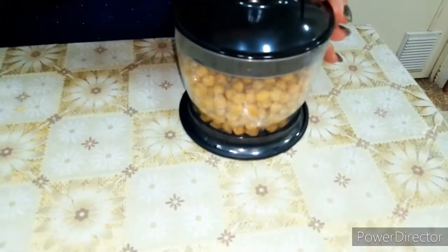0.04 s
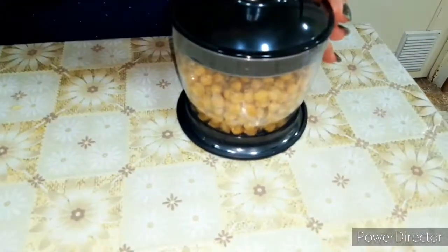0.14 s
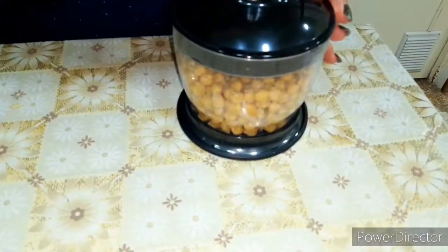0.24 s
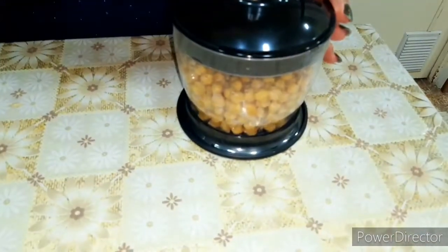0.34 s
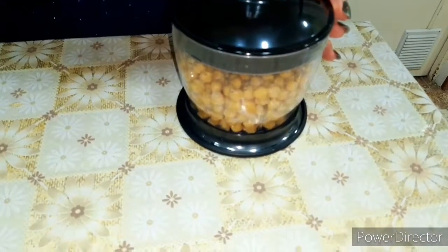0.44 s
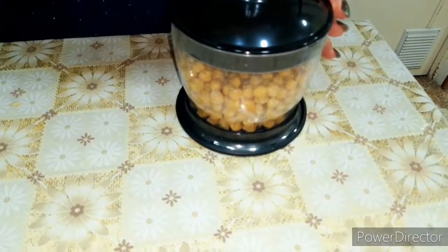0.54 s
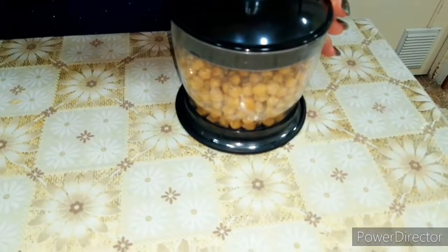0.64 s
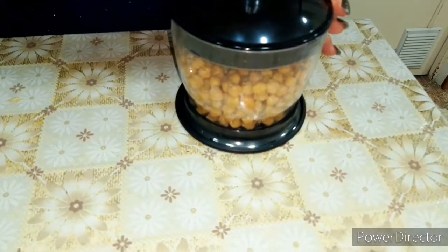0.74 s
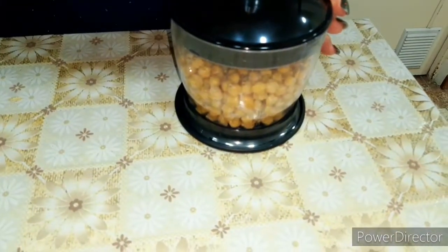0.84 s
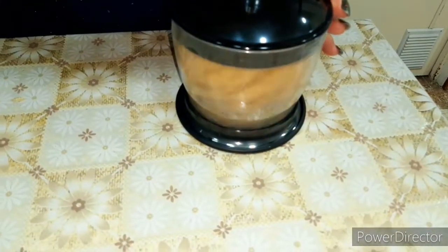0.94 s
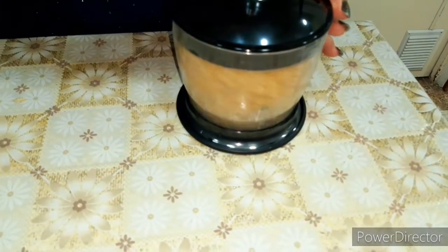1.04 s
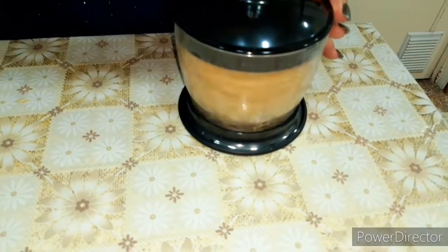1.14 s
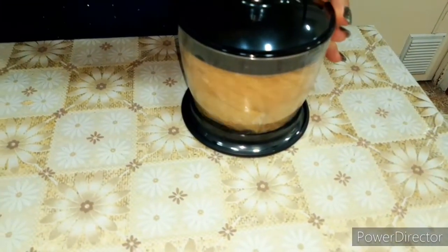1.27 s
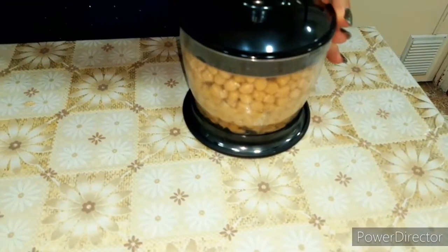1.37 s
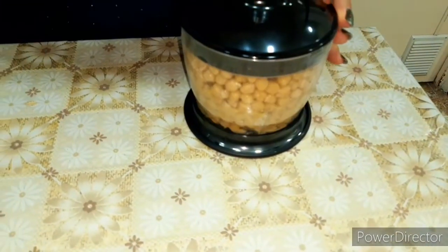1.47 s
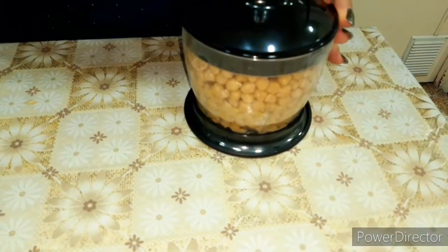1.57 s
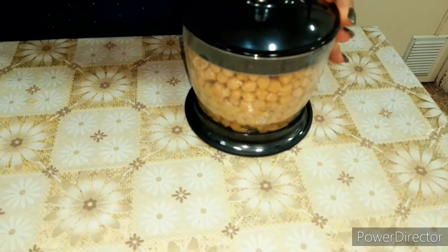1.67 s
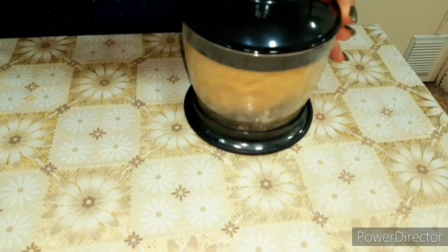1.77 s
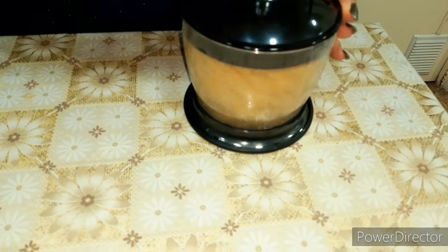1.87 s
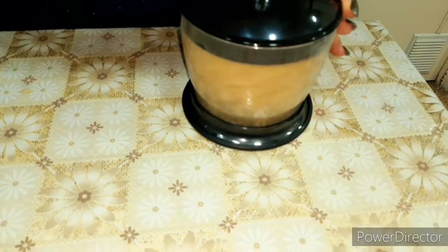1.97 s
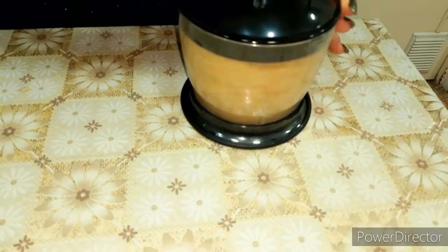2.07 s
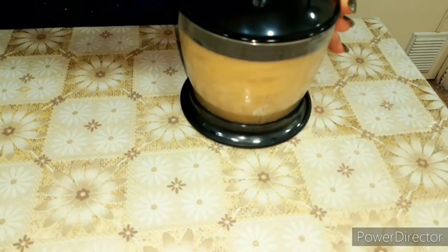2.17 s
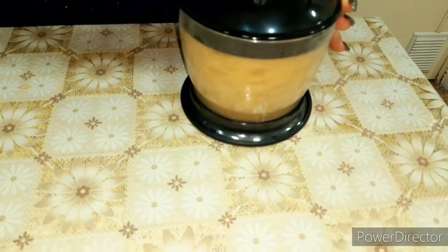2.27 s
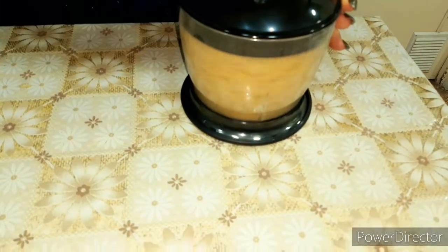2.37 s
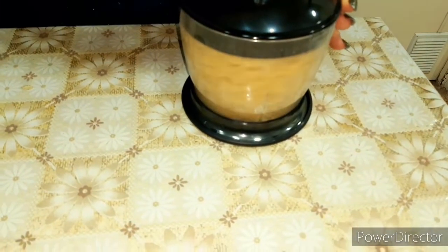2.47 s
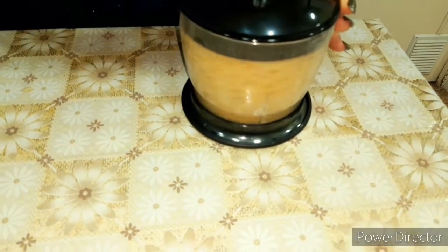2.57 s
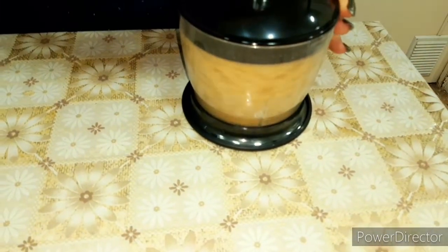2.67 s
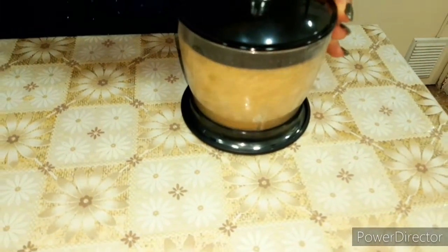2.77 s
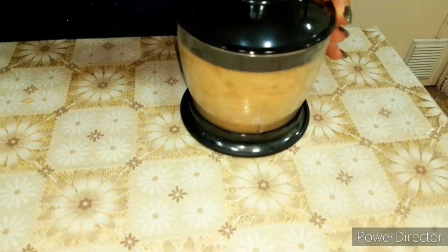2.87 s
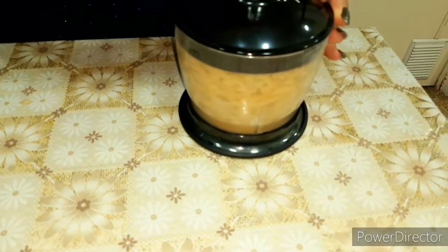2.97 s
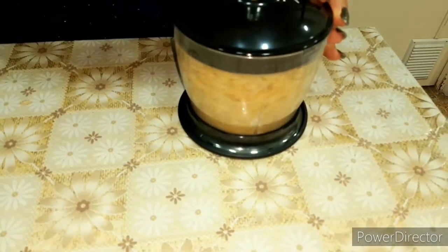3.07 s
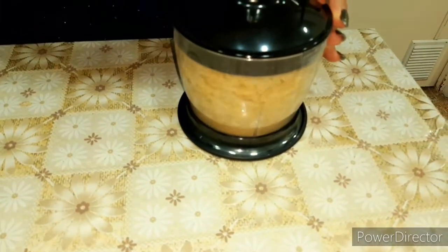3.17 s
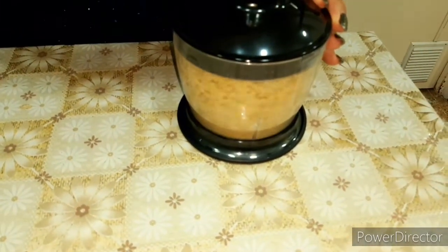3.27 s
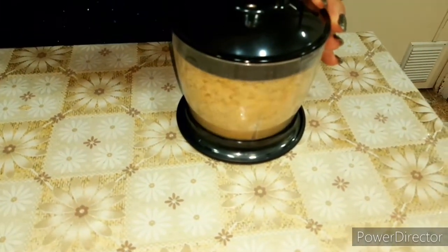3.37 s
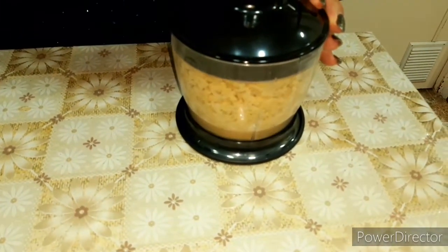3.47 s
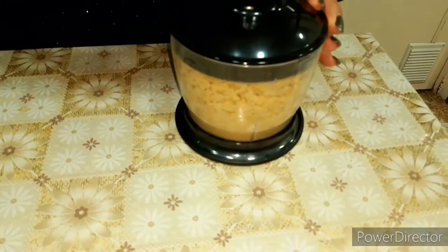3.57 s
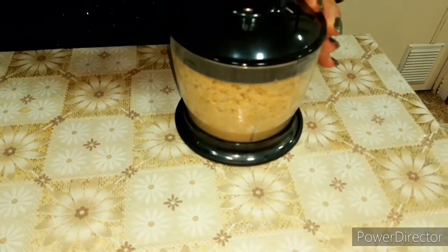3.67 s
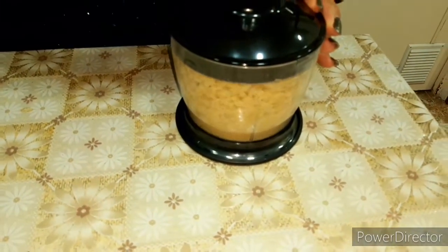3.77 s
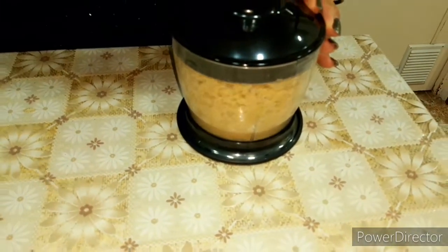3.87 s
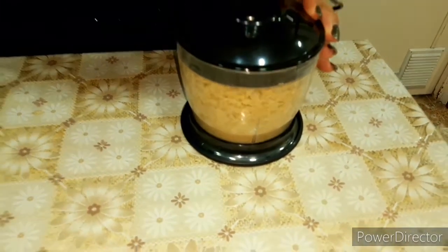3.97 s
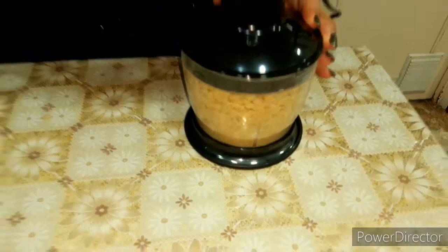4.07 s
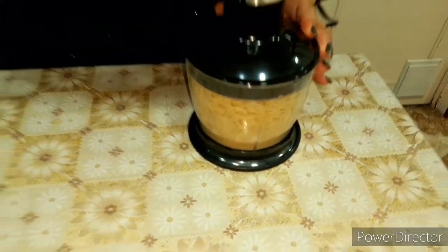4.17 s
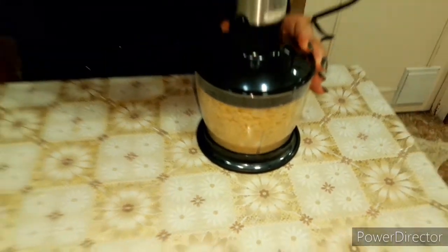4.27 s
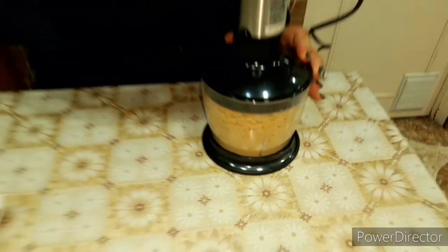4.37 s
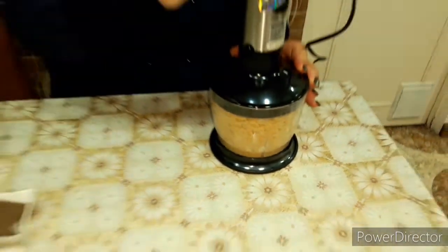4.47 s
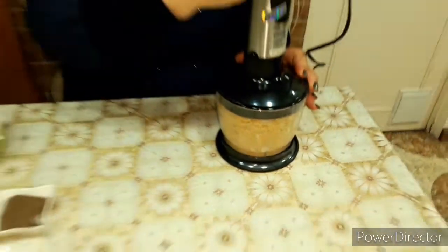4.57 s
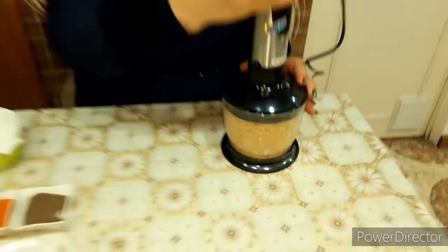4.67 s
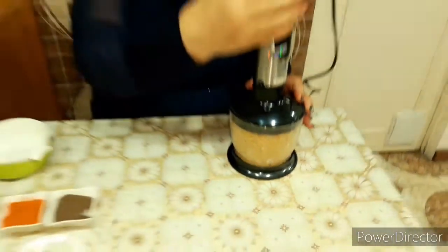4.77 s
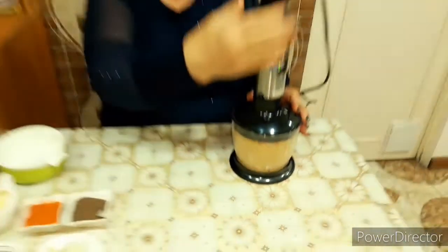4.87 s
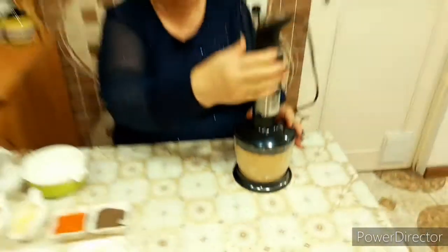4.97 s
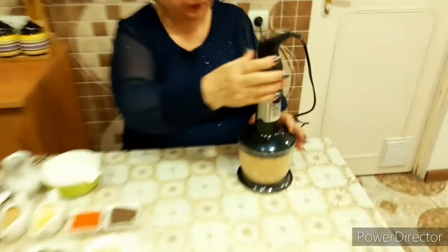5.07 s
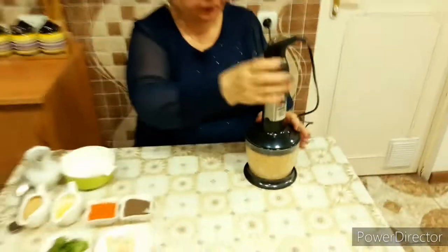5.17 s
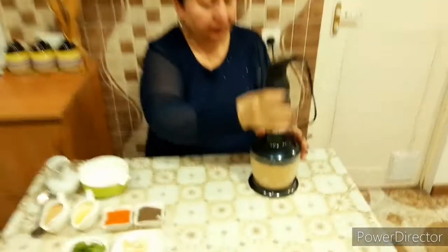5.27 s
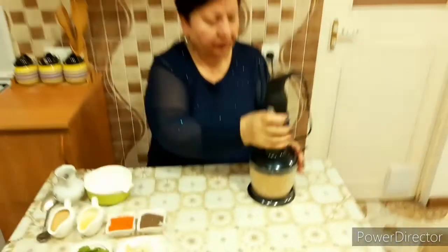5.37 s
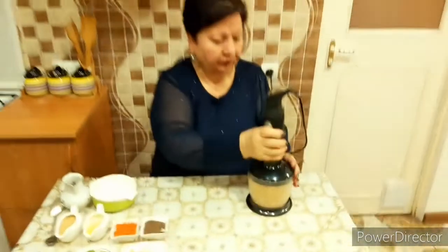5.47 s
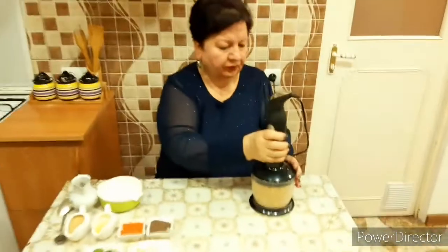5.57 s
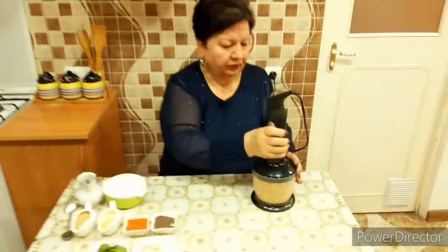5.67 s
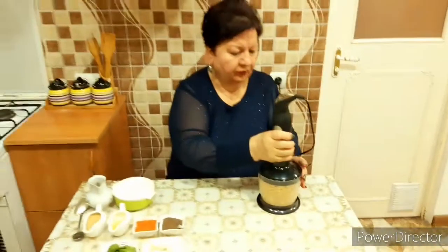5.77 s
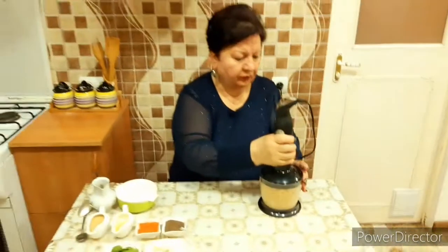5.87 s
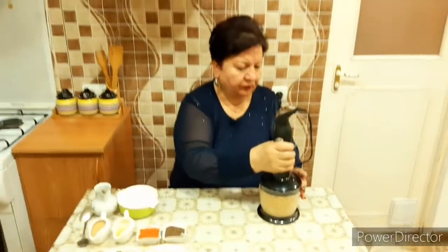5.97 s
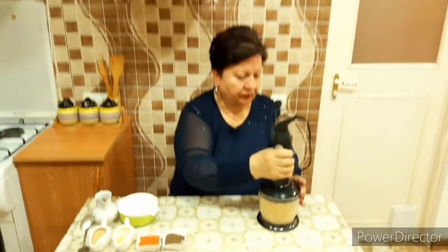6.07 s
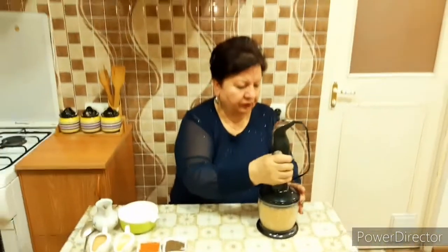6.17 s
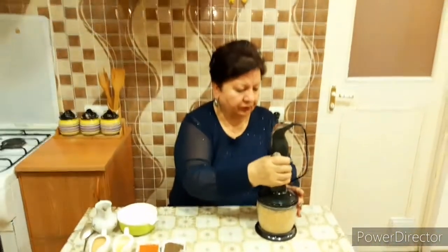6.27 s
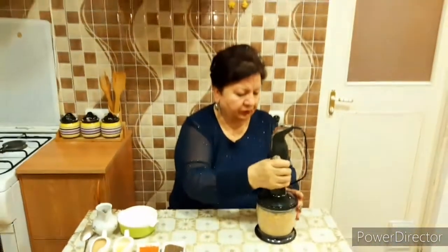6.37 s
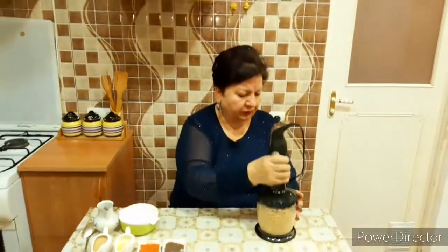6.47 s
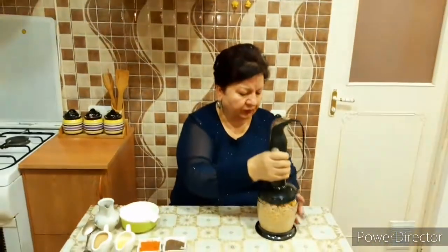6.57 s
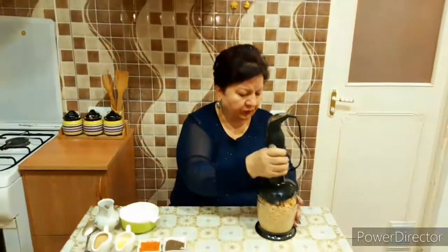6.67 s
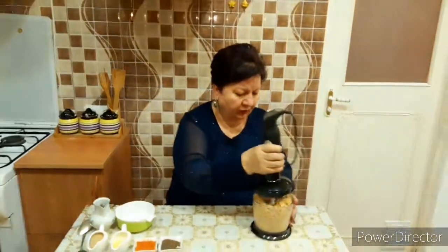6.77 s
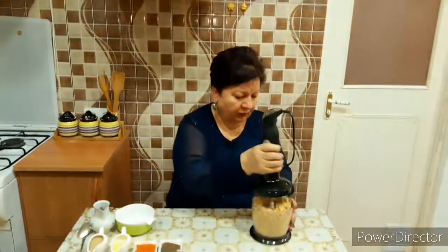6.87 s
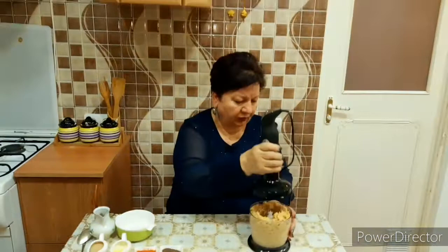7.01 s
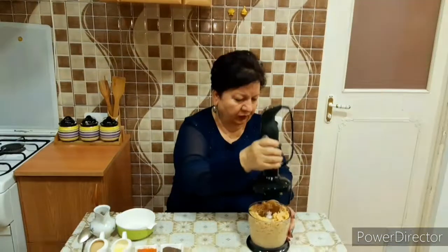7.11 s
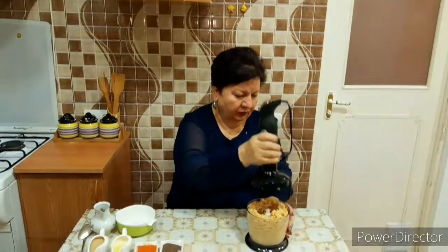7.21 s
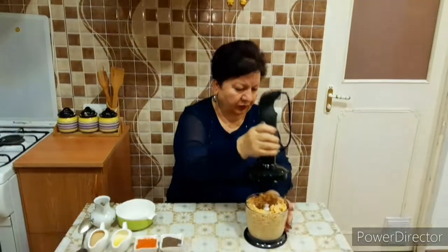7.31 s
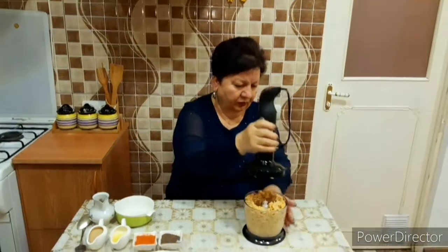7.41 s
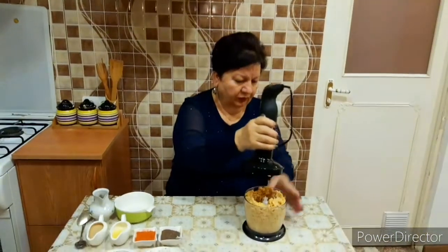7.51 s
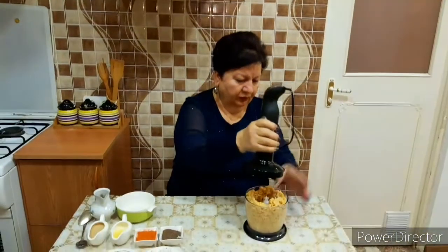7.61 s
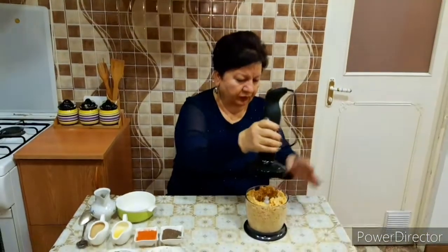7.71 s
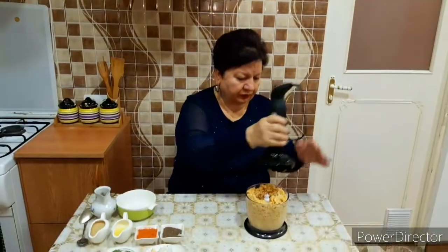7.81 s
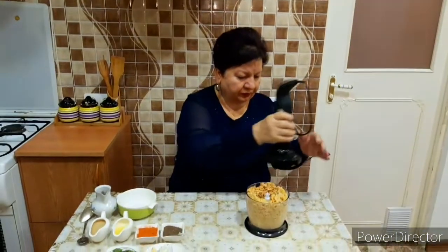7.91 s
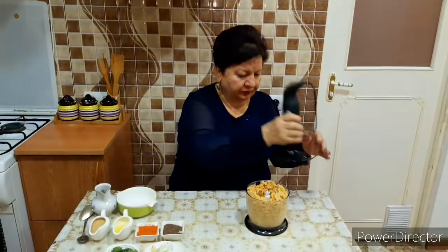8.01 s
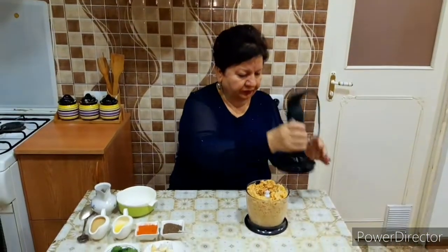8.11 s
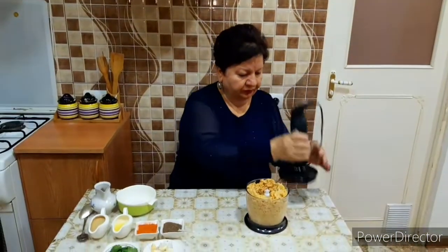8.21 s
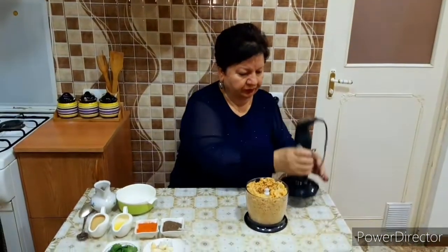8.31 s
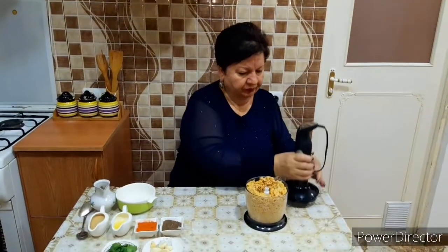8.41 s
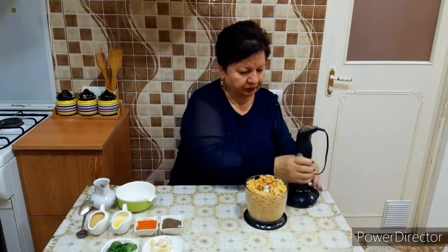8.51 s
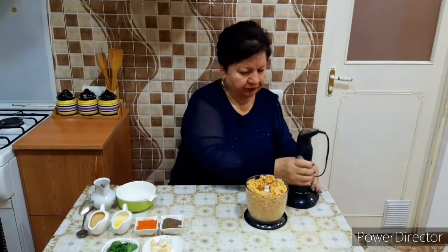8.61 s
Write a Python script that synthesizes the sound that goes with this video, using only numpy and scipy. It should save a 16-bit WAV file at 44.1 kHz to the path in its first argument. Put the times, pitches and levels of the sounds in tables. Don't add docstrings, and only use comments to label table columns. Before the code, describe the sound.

In a tiled kitchen, a whining geared motor crushes boiled chickpeas in a jumping plastic bowl, stops, and hands click the lid loose and lift it.

```python
import sys
import numpy as np
from scipy import signal
from scipy.fft import rfft, irfft, next_fast_len
from scipy.io import wavfile

SR = 44100
rng = np.random.default_rng(int(sys.argv[2]) if len(sys.argv) > 2 else 0)


def wav_record(signal):
    frames = np.transpose(np.atleast_2d(signal))
    bounded = np.clip(frames, -1, 1)
    quanta = np.round(bounded * 32767).astype(np.int16)
    wavfile.write(sys.argv[1], SR, quanta)


def magnitude_from_level(level_db):
    exponent = np.asarray(level_db, float) / 20
    return 10 ** exponent


N = 381465
SIZE = next_fast_len(N + SR)
MAINS_HZ = 50

# (frequency [Hz], time to die by 60 dB [s], echoes over direct sound [dB])
ROOM_REPLY = [(60, 0.57, -0.5), (150, 0.89, -5), (304, 0.46, -0.5), (600, 0.76, 0.5), (1520, 0.6, -2.5),
              (2980, 0.47, -4), (5900, .44, -1), (11700, .25, 2.5)]
# (frequency [Hz], level [dB per Hz])
CRUSH_COLOUR = [(2530, -26.5), (4300, -1.5), (6110, -4.5), (6620, -8), (7620, -6.5), (8590, -17),
                (10500, -12), (13000, -13.5), (14700, -17.5), (15100, -24), (15600, -38)]


def in_time(rows):
    s, *columns = np.transpose(rows)
    return [np.interp(np.arange(N) / SR, s, c) for c in columns]


def at_hz(points, hz):
    points = np.array(points)
    return np.interp(np.log(hz + 1), np.log(points[:, 0]), points[:, 1])


def rms_one(x):
    return x / np.sqrt(np.mean(x ** 2) + 1e-20)


def filtered(x, order, hz, kind):
    return signal.sosfilt(signal.butter(order, hz, kind, fs=SR, output="sos"), x)


def colour(x, spectrum, peaks=()):
    hz = np.fft.rfftfreq(SIZE, 1 / SR)
    db = at_hz(spectrum, hz)
    for f, width, lift_db in peaks:
        db = db + lift_db / (1 + (2 * (hz - f) / width) ** 2)
    return rms_one(irfft(rfft(x, SIZE) * magnitude_from_level(db), SIZE)[..., :N])


def drift(rate):
    r = np.exp(-40 * np.pi * rate / SR)
    slow = signal.lfilter([1], [1, -2 * r, r * r], rng.standard_normal(N // 20 + 4002))[4000:]
    return np.interp(np.arange(N) / 20, np.arange(len(slow)), rms_one(slow))


def grains(per_s, spread_db):
    sizes = magnitude_from_level(spread_db * np.minimum(rng.exponential(1, N), 4)) * rng.choice([-1, 1], N)
    return sizes * (rng.random(N) < per_s / SR)


def ring(clicks, hz, t60):
    r, w = magnitude_from_level(-60 / (t60 * SR)), 2 * np.pi * hz / SR
    return signal.lfilter([0, np.sin(w)], [1, -2 * r * np.cos(w), r * r], clicks + 1e-18)


def gestures(rows):
    t, power = np.arange(N) / SR, 0
    for s, swell, fade, *levels_db in rows:
        shape = magnitude_from_level(-20 * np.maximum((s - t) / swell, (t - s) / fade))
        power = power + (magnitude_from_level(np.array(levels_db))[:, None] * shape) ** 2
    return np.sqrt(power)


def diffuse(length):
    # (frequency [Hz], likeness [-1 to 1])
    likeness = [(60, 0.5), (130, 1), (290, 0.74), (640, 0.45), (1410, -0.51), (3100, -0.53), (6820, -0.14),
                (15000, -0.15)]
    mid, side = rfft(rng.standard_normal((2, length)))
    alike = np.clip(at_hz(likeness, np.fft.rfftfreq(length, 1 / SR)), -.99, .99)
    both = np.sqrt(1 + alike) * mid + np.sqrt(1 - alike) * side * [[1], [-1]]
    return irfft(both, length) / np.sqrt(2)


def echoes():
    t, noise, tail = np.arange(SR) / SR, rfft(diffuse(SR)), 0
    hz = np.arange(noise.shape[1])
    edges = 30 * 2 ** np.arange(0, 9.6, .5)
    for low, high in zip(edges, edges[1:]):
        t60 = at_hz(ROOM_REPLY, np.sqrt(low * high))
        band = irfft(noise * ((hz >= low) & (hz < high)), SR)
        tail = tail + band * magnitude_from_level(-60 * t / t60) * np.sqrt(2 * np.log(1000) / t60 / SR)
    return rfft(tail * np.clip(t / 0.011, 0, 1), SIZE)


def kitchen(x, room, lean, lead, wet_db):
    # (frequency [Hz], left minus right [dB])
    side_tilt = [(60, -1), (150, 2), (380, -2), (950, 3.5), (2380, 9), (5980, 3.5), (15000, 4.5)]
    hz, sides = np.fft.rfftfreq(SIZE, 1 / SR), np.array([[1], [-1]])
    wet = magnitude_from_level(at_hz(np.array(ROOM_REPLY)[:, ::2], hz) + wet_db)
    direct = magnitude_from_level(lean * at_hz(side_tilt, hz) * sides) * np.exp(1j * np.pi * hz * lead / SR * sides)
    return irfft(rfft(x, SIZE) * (direct + wet * room) / np.sqrt(1 + 0.77 * wet ** 2), SIZE)[:, :N]


def air():
    # (time [s], level [dB])
    gain_curve = [(0.0, -6), (0.12, -1.5), (0.5, -4.5), (0.9, -4.5), (1.6, -10.5), (4.85, -9), (5.15, -7),
                  (5.54, -6), (5.58, -8), (5.62, -4.5), (5.75, -1.5), (6.5, 0), (6.57, -1), (6.66, 0),
                  (8.65, 0)]
    # (frequency [Hz], level [dB per Hz])
    air_colour = [(20, -7.5), (50, -11.5), (80, -6), (120, 3), (200, -1.5), (400, 0), (550, -6.5),
                  (800, -12), (1100, -15), (2200, -26.5), (3500, -38.5), (6000, -42.5), (16000, -51.5)]
    # (frequency [Hz], width [Hz], lift [dB])
    cabinet = [(176, 8.8, 2), (392, 6.4, 11), (444.6, 15, 6), (790, 42, 8.5), (2220, 240, 1)]
    # (frequency [Hz], level [dB per Hz])
    hiss_colour = [(1000, -4), (4000, -0.5), (7500, -1), (9000, -5.5), (12000, 1), (15500, -1)]
    lift_db, = in_time(gain_curve)
    cycle = 4 * np.pi * MAINS_HZ * np.cumsum(1.005 + 0.0072 * drift(9.2)) / SR
    hum = magnitude_from_level(-54 + 1.9 * lift_db + 2.8 * drift(9)) * np.sin(cycle)
    third = magnitude_from_level(-55.9 + .9 * lift_db + 2.5 * drift(34)) * np.sin(3 * cycle)
    noise = magnitude_from_level(-54 + lift_db + 1.6 * drift(4.3)) * colour(diffuse(SIZE), air_colour, cabinet)
    hiss = magnitude_from_level(-78) * colour(rng.standard_normal((2, N)), hiss_colour)
    return noise + hum + third + hiss


def rustle():
    # (peak time [s], swell [s], fade [s], rubbing [dB], swish [dB])
    strokes = [(0.04, .03, .25, -69.5, -87), (0.134, 0.009, .16, -69, -74.5),
               (0.646, 0.18, .11, -71.5, -77.5), (4.95, .05, 0.32, -81, -77), (5.39, 0.72, 0.49, -73, -73),
               (5.61, .02, 0.55, -62, -64), (5.88, 0.0205, .2, -53.5, -64.5), (5.99, 0.198, 0.7, -63, -71),
               (6.6, 0.022, 0.21, -59, -65), (7.08, 0.5, 0.5, -66, -65.5), (7.54, .06, .3, -71, -78.5),
               (8.3, .3, 0.57, -76, -92), (8.6, .4, .2, -76.5, -86)]
    # (frequency [Hz], level [dB per Hz])
    rub_colour = [(450, -26.5), (700, -9.5), (1100, -3), (1600, -2.5), (2250, -6.5), (3100, -14),
                  (4000, -17), (6000, -44.5)]
    # (frequency [Hz], level [dB per Hz])
    swish_colour = [(2060, -21.5), (3100, 0.5), (5050, -3.5), (6650, 0.5), (8910, -12.5), (9840, -6.5),
                    (12600, -8.5), (15500, -15.5)]
    rub_gain, swish_gain = gestures(strokes)
    lid_peaks = [(2200, 500, 7), (3100, 720, 3.4)]
    rub = colour(grains(5500, spread_db=1.0), rub_colour, lid_peaks)
    swish = colour(grains(9000, spread_db=2.5), swish_colour)
    return magnitude_from_level(2.5) * rub_gain * rub + magnitude_from_level(-0.5) * swish_gain * swish


def taps():
    # (time [s], peak [dB], main ring [Hz], snap [dB], tick [dB])
    hits = [
        (0.043, -52, 800, -66, -75),
        (0.135, -48, 869, -65, -71),
        (5.603, -42, 837, -42.5, -56),
        (5.707, -42.5, 827, -58, -76),
        (5.87, -38, 1380, -47, -62.5),
        (5.877, -30.5, 1110, -48, -62),
        (6.269, -58, 695, -68, -64),
        (6.592, -46, 624, -54, -55),
        (6.964, -48.5, 641, -57, -69),
        (7.93, -57.5, 806, -72, -80),
    ]
    out, click = np.zeros(N), np.eye(1, SR // 2)[0]
    snap = ring(click, 1660, .005) - 0.82 * ring(click, 3280, 0.0045) + 0.79 * ring(click, 4700, 0.006)
    tick = ring(click, 6800, .003) - .4 * ring(click, 10500, .0015)
    t60 = 0.014
    for s, peak_db, hz, snap_db, tick_db in hits:
        body = ring(click, hz, t60) - .6 * ring(click, 2.4 * hz, 0.35 * t60)
        body = body + 0.84 * ring(click, 0.65 * hz, t60) - .5 * ring(click, 1.63 * hz, 0.63 * t60)
        hit = magnitude_from_level(peak_db - 0.5) * body + magnitude_from_level(snap_db + 2.0) * snap + magnitude_from_level(tick_db + 13.5) * tick
        start = round(s * SR)
        out[start:start + len(hit)] += hit
    return out


def drive():
    # (on [s], off [s], strength [dB], dying once released [dB per s], blade coasts [s])
    presses = [
        (0.9, 1.12, -0.5, 115, 0.27),
        (1.723, 4.343, -0.5, 50, 0.19),
    ]
    # (time [s], speed [turns per s])
    load_curve = [(1.0, 139), (1.8, 145), (1.94, 153), (1.99, 130), (2.065, 160), (2.3, 152), (3.0, 149.6),
                  (4.34, 142.7)]
    # (level [dB], lost at switch-on [dB], rise [s], lost as paste forms [dB], share of the dying [ratio])
    layers = [
        (-16, 14, 0.0083, 4, 1.34),
        (-17.5, 15, .025, 5, 0.8),
        (-25.5, 17, 0.025, 1.5, 1.8),
    ]
    # (time [s], length [s], knocking [dB], roar and crushing [dB])
    surges = [(0.93, 0.029, 6.5, 6.5), (1.02, 0.04, -1.5, 2), (1.08, 0.017, 5.5, -0.5),
              (1.78, 0.0087, 4.5, 6), (1.82, 0.028, -4, -2.5), (1.92, 0.059, 2.5, 1.5),
              (2.02, 0.026, -4.5, 0.5), (2.1, 0.038, 3.5, 2.5), (2.17, 0.015, -2, -1.5),
              (2.25, 0.034, 1.5, 0.5), (2.42, 0.1, -2, 1), (2.6, 0.095, 0.5, 0.5),
              (3.14, 0.056, -1.5, -0.5), (3.4, 0.039, 1.5, 0), (3.6, 0.074, -0.5, 0.5),
              (4.26, 0.042, -2.5, -0.5)]
    spin_up_s, coast_per_s2, idle_turns = .03, 740, 28
    freed_s, stopped_db_per_s = .09, 170
    t, (loaded,) = np.arange(N) / SR, in_time(load_curve)
    paste = np.clip((t - 2.725) / 1.54, 0, 1)
    speed, freed, levels = np.full(N, idle_turns * 1.0), np.zeros(N), np.full((3, N), -150.0)
    base, start, rise, soften, share = np.array(layers).T[..., None]
    for on, off, db, dying, coasts in presses:
        held, coast = np.maximum(t - on, 0), np.maximum(t - off, 0)
        speed = np.maximum(speed, loaded * (1 - np.exp(-held / spin_up_s)) - coast_per_s2 * coast)
        level = base + db - start * np.exp(-held / rise) - soften * paste - share * dying * coast
        level = level - stopped_db_per_s * np.maximum(coast - coasts, 0)
        levels = np.where(t >= on, level, levels)
        freed += (coast > 0) * np.exp(-(coast / freed_s) ** 4)
    low, bright = 0, 0
    for s, length, knock_db, bright_db in surges:
        bump = np.exp(-((t - s) / length) ** 2)
        low, bright = low + knock_db * bump, bright + bright_db * bump
    return speed, levels + [low, bright, bright], paste, freed


def knocking(blade, paste):
    # (frequency [Hz], level [dB per Hz])
    knock_colour = [(35, -64.5), (60, -35.5), (213, -5.5), (282, -6.5), (319, -5), (423, -8), (988, -7),
                    (1180, -13), (1500, -16.5), (1950, -48.5), (3300, -120)]
    # (frequency [Hz], width [Hz], lift [dB])
    bowl_peaks = [(128, 22, 8), (222, 22, 2.5), (325, 55, 4.5), (358, 20, 3), (580, 150, 4), (981, 130, 1)]
    hits = grains(3500 * magnitude_from_level(2.5 * drift(30)), spread_db=3.0)
    knock = colour(hits * (1 + .15 * blade), knock_colour, bowl_peaks)
    return knock + (magnitude_from_level(1 - 4.5 * paste) - 1) * filtered(knock, 1, 330, "low")


def motor_roar(turns, blade, mains, slowed, paste):
    # (frequency [Hz], level [dB per Hz])
    roar_colour = [(650, -27), (1100, -4.5), (1250, -13.5), (1490, -2.5), (2220, -0.5), (2700, -4),
                   (3000, -7), (3690, 0.5), (4300, -16), (5590, -38), (9460, -91)]
    beat = 1 + 0.17 * blade + 0.23 * np.cos(turns) + .12 * mains
    roar = colour(rng.standard_normal(N) * beat, roar_colour)
    upper = filtered(roar, 1, [3100, 4300], "band")
    return roar - .85 * slowed * (1 - .3 * paste) * upper


def gear_whine(turns, speed, paste, freed):
    # (pitch [thirds of shaft speed], level [dB])
    mesh = [(1, -6), (33, -7.5), (36, -7), (38, -12.5), (39, -10), (40, -12.5), (41, -11), (42, -9),
            (69, -4.5), (72, -7), (74, -9.5), (75, -13.5), (144, -8)]
    # (frequency [Hz], width [Hz], lift [dB])
    housing = [(1820, 1600, 22), (3850, 1100, 25.5)]
    tones = 0
    for thirds, db in mesh:
        tones = tones + magnitude_from_level(db + 3.3 * drift(20)) * np.sin(thirds * turns / 3 + 6 * rng.random())
    smear = magnitude_from_level(-1.5) * drift(260) * np.sin(13 * turns) + magnitude_from_level(-5.5) * drift(140) * np.sin(24 * turns)
    gear_db = np.maximum(-9 + 0.31 * (speed - 150) + 12.5 * paste, -22.5)
    whine = magnitude_from_level(gear_db) * colour(tones + smear, [(20, 0.003), (20000, 0.007)], housing)
    whistle_db = -19 + 16.5 * paste * freed
    return whine + magnitude_from_level(whistle_db + 2.2 * drift(40)) * np.sin(36 * turns)


def crushing(blade, mains, slowed, paste):
    cuts = grains(12000 * magnitude_from_level(2.4 * drift(40)), spread_db=3.5)
    crush = colour(cuts * (1 + .1 * mains + .1 * blade), CRUSH_COLOUR)
    cracks = grains(55 * magnitude_from_level(-18 * paste), spread_db=5.5)
    burst = signal.lfilter([1], [1, -.985], np.abs(cracks))
    crush = crush * (1 + .9 * np.tanh(burst))
    return crush - .7 * slowed * filtered(crush, 1, 6000, "high")


def hard_splits():
    # (time [s], peak [dB])
    splits = [(0.9574, -15), (1.0081, -12.5), (1.0271, -19), (1.054, -14.5), (1.0804, -22.5), (1.1523, -28),
              (1.7943, -17), (1.9979, -19.5), (2.0173, -22), (2.2064, -18.5), (2.2374, -18), (2.3564, -20)]
    hard = np.zeros(N)
    s, peak_db = np.transpose(splits)
    hard[(s * SR).astype(int)] = magnitude_from_level(peak_db - 3)
    noise = colour(rng.standard_normal(N), CRUSH_COLOUR, [(11500, 5000, 8)])
    return signal.lfilter([1], [1, -.992], hard) * noise


def blender():
    speed, (knock_db, roar_db, crush_db), paste, freed = drive()
    turns = 2 * np.pi * np.cumsum(speed * (1 + .0015 * drift(25))) / SR
    blade = np.cos(turns / 3)
    mains = np.cos(4 * np.pi * MAINS_HZ * np.arange(N) / SR)
    slowed = np.clip((130 - speed) / 60, 0, 1)
    knock = magnitude_from_level(knock_db + 0.08) * knocking(blade, paste)
    motor = motor_roar(turns, blade, mains, slowed, paste) + gear_whine(turns, speed, paste, freed)
    crush = magnitude_from_level(crush_db + 0.14) * crushing(blade, mains, slowed, paste)
    return knock + magnitude_from_level(roar_db - 1.5) * motor + crush + hard_splits()


def thumps():
    # (time [s], peak [dB], ring [Hz], time to die by 60 dB [s])
    bowl_jumps = [(0.908, -13, 123.9, 0.28), (0.926, -14, 203.4, 0.11), (0.979, -13.5, 188.7, 0.048),
                  (1.079, -15.5, 215, 0.33), (1.738, -25, 128, 0.17), (1.909, -20, 135.3, 0.35),
                  (1.996, -13.5, 68.2, .07), (2.1, -15, 205, .2), (2.165, -14.5, 325, .2),
                  (2.226, -9.5, 335, .2), (2.65, -14, 330, .2), (2.93, -14.5, 330, .15)]
    # (time [s], peak [dB], ring [Hz], time to die by 60 dB [s])
    lid_rings = [
        (6.595, -43.5, 590, 0.11),
        (6.595, -55, 1280, 0.085),
        (6.594, -49, 3000, 0.027),
        (6.612, -56, 2610, .04),
        (6.63, -51, 3450, .03),
        (6.648, -59, 2120, .04),
        (6.665, -51, 3100, .03),
    ]
    out, click = np.zeros(N), np.eye(1, SR // 2)[0]
    soft = np.minimum(np.arange(len(click)) / SR / .003, 1)
    for s, db, hz, t60 in bowl_jumps + lid_rings:
        start = round(s * SR)
        out[start:start + len(click)] += magnitude_from_level(db) * ring(click, hz, t60) * soft
    return out


def drag():
    # (peak time [s], swell [s], fade [s], level [dB])
    foot_slips = [
        (5.81, 0.11, 0.076, -46),
        (5.91, 0.11, .07, -39),
        (6.07, 0.095, 0.13, -44.5),
        (6.18, .12, 0.021, -39.5),
        (6.29, .1, 0.151, -52),
    ]
    slips = grains(300, spread_db=-4.0)
    table = sum(ring(slips, hz, 0.059) for hz in (163, 215, 268.0, 309.0))
    table = rms_one(filtered(table, 2, [150, 380], "band"))
    bowl = ring(slips, 560, .03) - ring(slips, 780, .03) + ring(slips, 950, .025)
    return (table + magnitude_from_level(-10.5) * rms_one(bowl)) * gestures(foot_slips)[0]


def squeak():
    # (peak time [s], swell [s], fade [s], level [dB])
    rim_rubs = [
        (5.95, .2, 0.49, -72),
        (6.64, .05, 0.21, -70),
        (6.83, .15, .15, -73),
        (6.96, .1, .3, -65),
        (7.25, .3, 0.38, -70),
    ]
    pitch_hz = 2240 * (1 + .05 * drift(6))
    tone = drift(120) * np.sin(2 * np.pi * np.cumsum(pitch_hz) / SR)
    return np.sqrt(2) * tone * gestures(rim_rubs)[0]


def scene():
    room = echoes()
    running = kitchen(blender(), room, lean=0.53, lead=.6, wet_db=0.67)
    handled = rustle() + taps() + thumps() + drag() + squeak()
    return air() + kitchen(handled, room, lean=-0.085, lead=-1.5, wet_db=0.5) + running


def top_cut(x):
    return signal.sosfilt(signal.butter(12, 15630, fs=SR, output="sos"), x)


def record(dry):
    cut = filtered(dry, 2, 70, "high")
    cut = signal.sosfilt(signal.cheby2(12, 60, 15800, fs=SR, output="sos"), cut)
    mix = 1.3 * np.tanh(cut / 1.3)
    return top_cut(mix)


dry = scene()
out = record(dry)
wav_record(out)
```